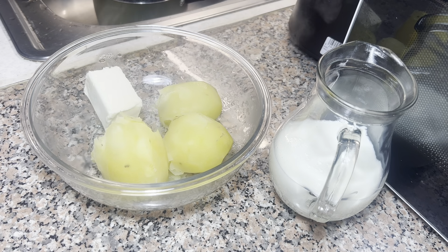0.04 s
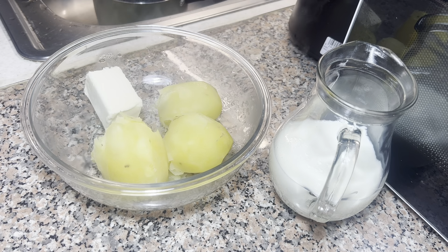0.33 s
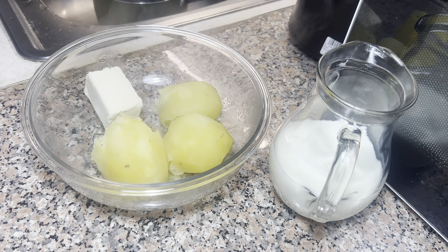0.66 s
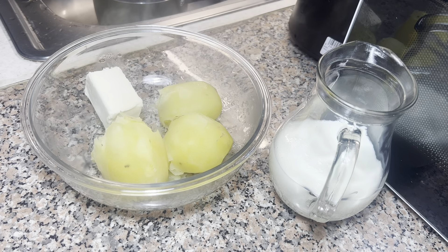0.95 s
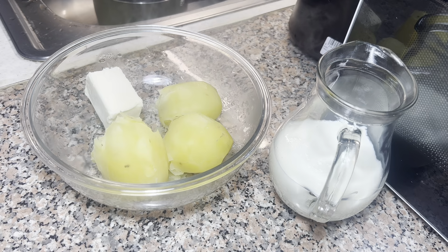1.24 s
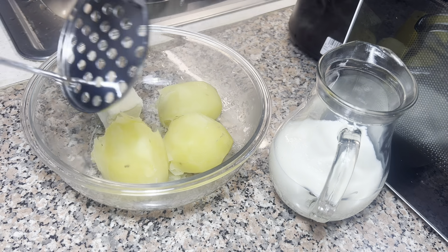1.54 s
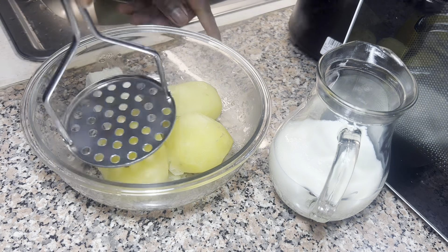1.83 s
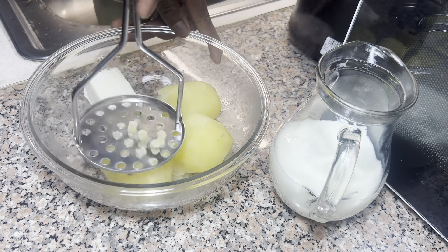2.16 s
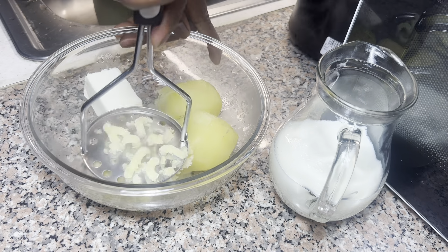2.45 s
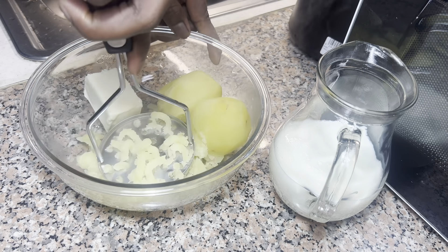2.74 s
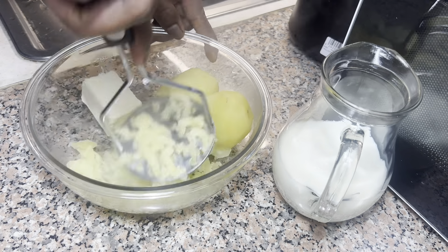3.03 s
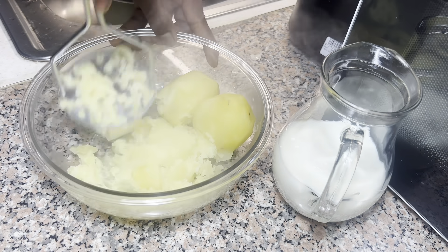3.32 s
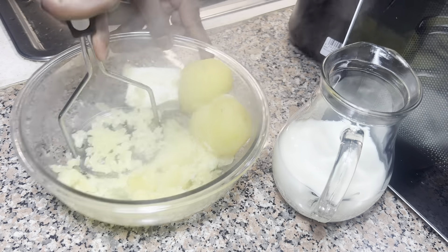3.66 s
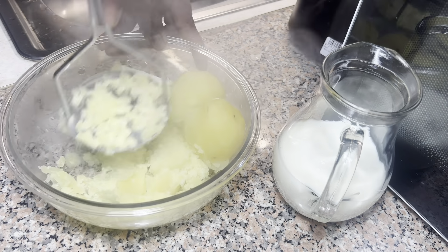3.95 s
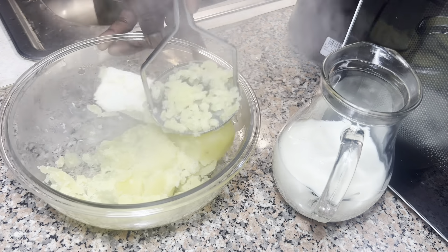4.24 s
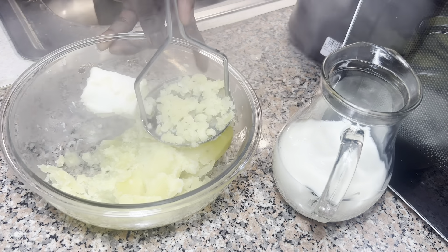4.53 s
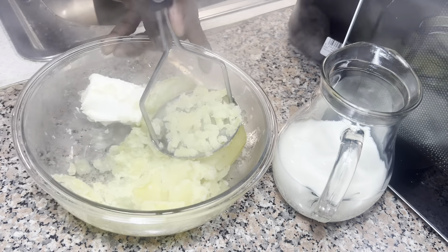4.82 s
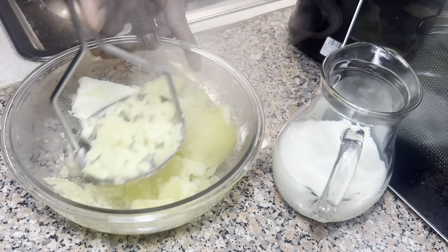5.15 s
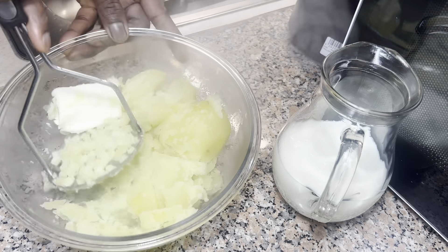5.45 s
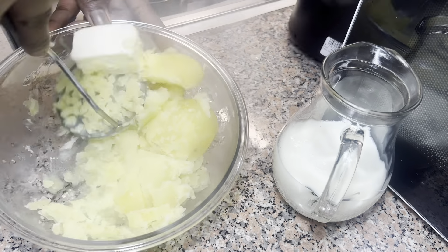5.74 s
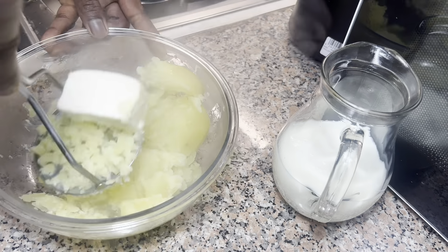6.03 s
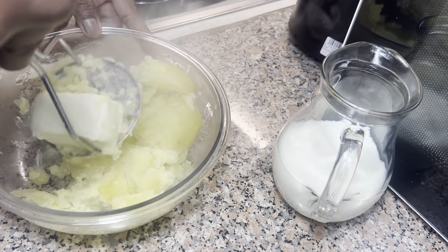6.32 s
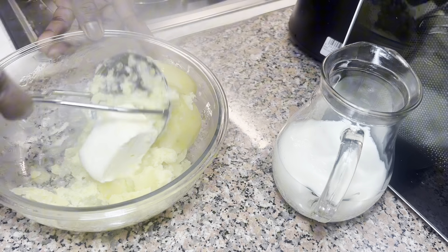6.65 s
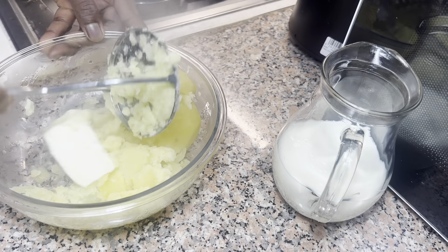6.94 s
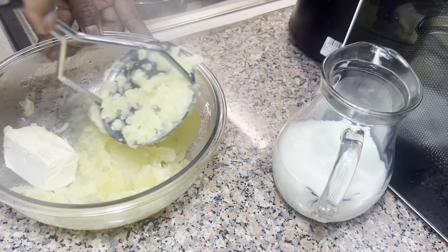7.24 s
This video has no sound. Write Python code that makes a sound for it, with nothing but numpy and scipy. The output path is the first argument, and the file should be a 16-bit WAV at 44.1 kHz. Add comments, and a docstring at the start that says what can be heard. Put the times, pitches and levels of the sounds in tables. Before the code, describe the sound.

A steel masher presses boiled potatoes in a glass bowl, close to the microphone in a small kitchen. Faint wet squishes and a light tick lead to a sharp knock with a ringing metal clink. Irregular clusters of short, hollow knocks follow, with brief rubs on the glass and dull thuds through the stone counter. After a lull come a few last knocks, over a low hum and even hiss.

```python
"""Mashing potatoes in a glass bowl

A steel masher breaks through boiled potatoes and knocks on the glass, close to the microphone. Each impact
excites the modes of the bowl, which a hand damps; bare steel ticks, and the stone counter thuds under the
pushes. One blow leaves the masher's plate free to clink. Between blows, friction makes the plate rub on
the glass and the mash squishes faintly, in a small kitchen with a low hum and an even hiss."""
import sys
import numpy as np
from scipy import signal
from scipy.fft import rfft, irfft, next_fast_len
from scipy.io import wavfile

SR = 44100
rng = np.random.default_rng(int(sys.argv[2]) if len(sys.argv) > 2 else 0)


def master(y):
    """Save y as 16-bit WAV."""
    cut = np.clip(np.atleast_2d(y).T, -1, 1)
    pcm = np.round(cut * 32767)  # scale
    wavfile.write(sys.argv[1], SR, pcm.astype(np.int16))


N = 321048

# Blows of the masher on the bowl. Each row: start in seconds, strength in dB, padding from 0 (bare steel)
# to 1 (thick potato), then frequency in Hz and relative level in dB for each of four resonances that the
# place of contact favours: the hollow note, two glass notes and a region of the steel.
BLOWS = [ (2.225, -32, 0.2, 320, -1, 1095, -7, 650, -10.5, 3400, 9),
         (2.858, -15, 0.49, 346, -1.5, 979, -5.5, 1532, -11, 4300, 2),
         (3.323, -39.5, 0.55, 496, 4, 1051, -2.5, 888, -6, 2150, 0),
         (3.572, -19.5, 0.81, 406, -4.5, 889, -5.5, 1330, -10, 2430, 22),
         (3.588, -22.5, 0.15, 385, 1, 986, 2, 2140, -4, 4600, 16),
         (3.6007, -29.5, 0.48, 402, 13, 1082, 8, 890, -10, 2400, 10),
         (3.621, -33.5, .85, 420.5, 12, 896, 2, 1140, -7, 2560, 11),
         (3.6892, -30.5, 0.83, 488, 0.5, 1091, 9.5, 1340, -1, 2620, 5),
         (3.794, -32, 0.95, 472, 2.5, 657, -0.5, 1360, -2, 2610, 7),
         (4.224, -50, 0.9, 492, 10, 984, -10, 732, -10, 3540, 5),
         (4.571, -23, 0.72, 383, -3.5, 1070, -3, 1330, -4, 2280, 6.5),
         (4.599, -29.5, 0.9, 305, 2, 1141, -1.5, 1345, -3, 3370, 15),
         (4.61, -38, 0.86, 385, 8, 1119, -6, 710, 2.5, 2100, -3),
         (4.621, -34, .92, 415, -4, 712, -1, 977, -11, 2400, 3),
         (4.638, -48.5, 0.98, 375, -10, 1160, 13, 665, 9, 2080, 0),
         (4.903, -16.5, 0.5, 307, -3, 1060, -7, 742, -3.5, 2420, 15.5),
         (4.916, -23, .76, 322, 6, 1062, 1, 764, 0, 3600, 18),
         (4.932, -28, 0.97, 350, -6, 780, -4, 1480, 6, 3680, 9),
         (4.943, -29.5, 1, 323, 1.5, 1480, -8, 758, 1, 3700, 19),
         (5.099, -41, 1, 412, -2, 830, -8, 616, -1, 3620, 6),
         (5.35, -28.5, 0, 290, 11, 1053, -1, 875, -5.5, 1950, 3.5),
         (5.3935, -17, 0.67, 576, -1, 890, -9, 2142, -5.5, 3610, 19.5),
         (5.405, -24.5, 0.86, 580, 6, 1317, -6, 740, -9, 2140, 11),
         (5.474, -31.5, 0.73, 408, 13, 742, -1, 1050, 0.5, 3600, 15.5),
         (5.568, -25, 0.66, 464, 5.5, 753, -1, 1254, -5, 3540, 13.5),
         (5.691, -39, 0.77, 482, 5, 770, 9.5, 1350, -9, 3580, 8),
         (6.7054, -29, 0.86, 491, 4, 958, -.5, 1320, -12, 2120, 0),
         (6.7483, -23, 0.85, 317, -1.5, 1069, -6.5, 1487, -5, 3480, 12),
         (6.757, -34, 0.67, 321, 6.5, 736, 4, 1500, 8, 3280, 15.5),
         (7.033, -58.5, 0, 470, 5, 753, -6, 1480, -10, 4700, 6)]
# Edges in Hz of the six bands in which a blow is coloured.
BLOW_BAND_EDGES = [210, 600, 1560, 2700, 5000, 9000, 17000]
# Colour of a bare blow and of one through thick potato. Each row: frequency in Hz, band level in dB.
BARE_COLOUR = [(320, -10), (1000, -0.5), (2100, -3), (3700, -5), (6700, -7), (12400, 5.5)]
PADDED_COLOUR = [(320, -4), (1000, 0), (2100, -24), (3700, -29), (6700, -35.5), (12400, -44)]
# Resonances of the wire handle and plate. Each row: frequency in Hz, bandwidth in Hz, gain in dB.
HANDLE_RESONANCES = [(2055, 40, -15), (2670, 53, 4), (3450, 500, -0.5), (3820, 100, -7), (5800, 1100, -7),
                     (6760, 120, 3), (8410, 1600, 1.5), (11000, 850, 7.5), (13800, 900, -7)]
# Normal modes of the held bowl, the masher's wire frame, its plate and the stone counter.
# Each row: frequency in Hz, relative level in dB, time to decay by 60 dB (t60) in seconds.
BOWL_MODES = [(323.7, -10.5, 0.11), (411.6, -11, 0.19), (486.7, -6.5, 0.18), (594, -4.5, 0.089),
              (656, -1.5, 0.064), (750, 3.5, 0.069), (873, 8.5, 0.025), (963.5, 5, 0.07),
              (1063, 7.5, 0.056), (1160, -7.5, .1), (1329, 7, 0.065), (1497, 4.5, 0.084),
              (1915, 10.5, 0.036), (2116, 8.5, 0.04), (2414, 2.5, 0.056), (2610, -4, 0.094),
              (3420, -1, .05), (3520, 5.5, .06), (3730, 9, 0.078), (4330, 6, .045), (5660, 14.5, 0.062),
              (7150, -4.5, .05), (8560, -2.5, .05), (11200, -2.5, .04)]
FRAME_MODES = [(3190, -1, 0.047), (3680, -9, 0.052), (4270, 0, 0.055), (4460, 5, 0.042), (5990, 1, 0.036),
               (6200, -6, 0.041), (7740, -2, 0.063), (8630, -4, 0.035), (9180, -10, 0.044), (9900, 1, .04),
               (10900, -24, 0.017), (12300, -21, 0.034), (13635, -15, 0.046), (15340, -6, 0.022)]
PLATE_MODES = [(1510, 1, .09), (1650, 3, .053), (1895, 4.5, 0.033), (2750, -10, 0.13), (2969, -5.5, .8),
               (3240, 9.5, 0.019), (4218, -8.5, 0.19), (4250, 11.5, 0.042), (6240, -22, .24),
               (7172, -11.5, 0.21), (7845, -15, 0.15), (8105, -21, .13), (8387, -21, .15),
               (8600, -18, 0.17), (10120, -16, 0.14), (10600, -9, .1), (11950, -14, 0.11),
               (15200, -13, .075)]
COUNTER_MODES = [(66.2, -8.5, 0.28), (75.4, -14, .4), (95, -10, 0.29), (121.8, -4.5, 0.51),
                 (127.8, -12.5, 0.76), (163.8, -19, 0.76), (193.6, -8, 0.17)]
# Bare steel on glass. Each row: start in seconds, ring in dB, favoured frequency in Hz, click in dB.
BARE_CONTACTS = [(2.226, -28.5, 4600, -31), (3.588, -29, 12500, -9), (4.903, -30.5, 3700, -20),
                 (5.35, -25, 9000, -16), (5.394, -33.5, 3700, -34)]
# Pushes that reach the counter. Each row: start in seconds, strength in dB, deep-mode gain in dB.
COUNTER_PUSHES = [(3.323, -46, 11), (3.59, -27, 4.5), (4.591, -33, 9.5), (4.904, -27.5, 5), (5.373, -33, 2),
                  (5.477, -36, -4), (5.564, -37, -5), (6.749, -34, 0), (7.047, -37.5, 0)]
# The blow that frees the plate. Each row: start in seconds, strength in dB, free ringing in seconds.
FREE_BLOWS = [(2.86, -21, 0.13)]
# The plate's rim on the glass. Each row: centre and half length in seconds, frequency in Hz, level in dB.
RIM_RUBS = [(2.814, 0.023, 1300, -50), (2.85, .009, 1160, -37.5), (3.57, 0.0053, 975, -28),
            (3.629, 0.016, 2520, -36), (4.564, .014, 1090, -42.5), (4.675, 0.026, 1220, -44),
            (4.707, 0.054, 1140, -48.5), (4.897, 0.003, 1080, -32), (5.435, 0.013, 3750, -50),
            (5.508, .012, 450, -34), (5.54, 0.029, 1950, -47), (5.587, 0.012, 2030, -44),
            (5.614, 0.026, 2110, -41), (5.629, 0.019, 870, -36), (5.635, .03, 2760, -56),
            (5.637, 0.01, 1524, -41), (5.638, 0.012, 2010, -42), (5.648, 0.047, 450, -37.5),
            (6.119, 0.013, 910, -56), (6.25, 0.012, 934, -56), (6.595, 0.037, 2680, -63.5)]
# Potato forced through the holes. Each row: centre and half length in seconds, level in dB.
SQUEEZES = [(1.807, 0.04, -64), (2.553, 0.063, -51.5), (2.83, 0.1, -53.5), (3.315, 0.031, -50),
            (6.3, 0.27, -59.5), (6.66, 0.079, -61)]
# Spectra of the mash, the hum and the hiss. Each row: frequency in Hz, relative spectral density in dB.
MASH_SPECTRUM = [(200, 5), (500, 8), (1200, 3), (3000, -1), (5500, -12), (8000, -7.5), (15000, -8.5)]
HUM_SPECTRUM = [(20, -53), (35, -16.5), (48, 4), (62, -7.5), (76, -12.5), (100, -5.5), (130, -8),
                (190, -22.5), (290, -13.5), (450, -29), (900, -36), (3000, -78)]
HISS_SPECTRUM = [(30, -14), (400, 1.5), (900, -1.5), (1400, 1.5), (1750, 6.5), (2300, -3.5), (3300, -6.5),
                 (4500, -3.5), (5600, -8.5), (6500, -7.5), (6900, -1), (7300, -6), (12000, -8),
                 (14200, -7.5), (15000, -9), (15700, -16), (16100, -23)]
# Reverberation of the kitchen. Each row: frequency in Hz, t60 in seconds.
KITCHEN_T60 = [(100, 0.64), (400, 0.54), (1200, 0.43), (3500, 0.27), (8000, 0.25), (15000, 0.2)]
# Stereo width by frequency: narrow in the bass, very wide near 10 and 15.6 kHz.
# Each row: frequency in Hz, side minus mid in dB.
STEREO_WIDTH = [(100, -14), (280, -9.5), (600, 1), (1050, -1.5), (2300, -0.5), (3000, -0.5), (4300, -1),
                (5700, -1), (7000, -7), (8600, -4.5), (10100, 35), (11600, -5.5), (13400, -14),
                (14200, -28), (15600, 12)]

CONTACT_RISE_S = 0.00054


def knocks(level_db=1, glass_t60=0.059):
    """Impact excitation: each blow gives a dense rattle and two short notes of the damped glass."""
    out, t = np.zeros((2, N)), np.arange(SR // 3) / SR
    for start, strength_db, padding, *favoured in BLOWS:
        hollow_hz, hollow_db, glass_hz, glass_db, second_hz, second_db, steel_hz, steel_db = favoured
        rattle = cushioned(impact(padding, glass_hz, t), padding, hollow_hz, hollow_db, t)
        onset = rattle * decay(t, t60=0.062)  # the steel is driven only at the start of a blow
        rattle = rattle + amp(steel_db) * resonance(onset, steel_hz, width_hz=420)
        clack = amp(glass_db) * unit_onset(note(glass_hz, glass_t60, t))
        clack += amp(second_db) * unit_onset(note(second_hz, glass_t60, t))
        knock = in_kitchen(rattle, tail_db=-10) + in_kitchen(clack, tail_db=-21)
        add(out, start, amp(strength_db + level_db) * knock)
    return out


def impact(padding, glass_hz, t):
    """Resonant response of masher and bowl: potato draws out the contact and lets the bowl ring more."""
    crack = amp(23) * decay(t, t60=0.018)
    rattle = amp(14) * decay(t, t60=blend(0.017, 0.066, padding))
    contact = (crack + rattle) * noise_pair(len(t))
    handle = sum(amp(db) * resonance(contact, hz, width) for hz, width, db in HANDLE_RESONANCES)
    bowl = amp(blend(-9, 2, padding)) * ring(BOWL_MODES, t, scatter_db=2.5)
    blow = contact + handle + bowl
    favoured_glass = amp(-2) * resonance(blow, glass_hz, width_hz=260)
    return (blow + favoured_glass) * rise(t, CONTACT_RISE_S)


def cushioned(blow, padding, hollow_hz, hollow_db, t, swell_s=0.0049):
    """A soft contact acts as a low-pass: potato dulls the upper bands; a hollow note builds below."""
    edges = np.transpose([BLOW_BAND_EDGES[:-1], BLOW_BAND_EDGES[1:]])
    centres = np.sqrt(edges.prod(axis=1))
    band_db = blend(along(BARE_COLOUR, centres), along(PADDED_COLOUR, centres), padding)
    bands = [signal.butter(5, pair, 'band', fs=SR, output='sos') for pair in edges]
    low, *upper = [unit_onset(signal.sosfilt(band, blow)) for band in bands]
    hollow = amp(-3) * (low + unit_onset(note(hollow_hz, t60=0.061, t=t)))
    hollow *= amp(band_db[0] + hollow_db) * rise(t, swell_s)
    return hollow + sum(amp(db) * part for db, part in zip(band_db[1:], upper))


def ticks(click_t60=0.01, favoured_octaves=0.93):
    """A hard contact is broadband: steel clicks on glass and excites one region of the frame's modes."""
    out, t = np.zeros((2, N)), np.arange(SR // 4) / SR
    treble = signal.butter(2, 1800, 'high', fs=SR, output='sos')
    for start, ring_db, favoured_hz, click_db in BARE_CONTACTS:
        modes = [(hz, db - 6 * (np.log2(hz / favoured_hz) / favoured_octaves) ** 2, t60)
                 for hz, db, t60 in FRAME_MODES]
        click = amp(click_db) * signal.sosfilt(treble, noise_pair(len(t))) * decay(t, click_t60)
        frame = amp(ring_db) * ring(modes, t, scatter_db=1.5)
        add(out, start, in_kitchen((click + frame) * rise(t, CONTACT_RISE_S), tail_db=-13))
    return out


def thuds(swell_s=0.025, level_db=7, deep_hz=95):
    """Structure-borne sound: a push passes through the bowl; its weight drives the counter's deep modes."""
    out, t = np.zeros((2, N)), np.arange(SR // 2) / SR
    for start, db, weight_db in COUNTER_PUSHES:
        modes = [(hz, mode_db + weight_db * (hz < deep_hz), t60) for hz, mode_db, t60 in COUNTER_MODES]
        add(out, start, amp(db + level_db) * ring(modes, t, scatter_db=3.0) * rise(t, swell_s))
    return out


def clinks(damped_t60=0.36, level_db=1):
    """Free vibration: the plate rings until it sinks into the mash, which adds damping."""
    out, t = np.zeros((2, N)), np.arange(SR // 2) / SR
    for start, db, free_s in FREE_BLOWS:
        plate = amp(db + level_db) * ring(PLATE_MODES, t, scatter_db=2.1)
        damping = decay(np.maximum(t - free_s, 0), damped_t60)
        add(out, start, in_kitchen(plate * damping, tail_db=-16, echo_db=-22))
    return out


def rubs(slips_per_s=2500, time_bandwidth=3.3):
    """Stick-slip friction: uneven slips drive one resonance; the longer the rub, the purer its squeak."""
    out, t = np.zeros((2, N)), np.arange(SR // 5) / SR
    for centre, half_s, hz, db in RIM_RUBS:
        width_hz = time_bandwidth / half_s
        slips = rng.standard_normal((2, len(t))) * (rng.random(len(t)) < slips_per_s / SR)
        squeak = unit(resonance(resonance(slips, hz, width_hz), hz, width_hz))
        add(out, centre - t.mean(), amp(db) * squeak * swell(t, t.mean(), half_s))
    return out


def squishes(size_spread=0.72):
    """Extrusion: mash pressed through the holes gives tiny wet crackles of log-normal size."""
    t = np.arange(N) / SR
    push = sum(amp(db) * swell(t, centre, half_s) for centre, half_s, db in SQUEEZES)
    crackle = rng.standard_normal((2, N)) * np.exp(size_spread * rng.standard_normal(N))
    return push * coloured(crackle, MASH_SPECTRUM)


def background(hum_db=-53, hiss_db=-57):
    """Stationary noise: the kitchen's low hum, weaker in the side channel, and an even hiss."""
    hum = coloured(rng.standard_normal((2, N)), HUM_SPECTRUM) * amp([[0], [-5]])
    hiss = coloured(rng.standard_normal((2, N)), HISS_SPECTRUM)
    return amp(hum_db) * hum + amp(hiss_db) * hiss


def in_kitchen(x, tail_db, echo_db=-6, echo_s=0.0122, scatter_s=0.008):
    """Reflection: nearby things scatter, a wall echoes dully, and the tail loses its treble first."""
    hz, t, spectra = signal.stft(rng.standard_normal((2, SR // 2)), SR, nperseg=256)
    tail = signal.istft(spectra * decay(t, along(KITCHEN_T60, hz)[:, None]), SR, nperseg=256)[1]
    t = np.arange(tail.shape[1]) / SR
    tail *= rise(t, 0.00063)
    scatter = rng.standard_normal(tail.shape) * (t > scatter_s) * np.exp(-np.abs(t - scatter_s) / 0.001)
    room = (amp(tail_db) * unit(tail) + amp(-19) * unit(scatter)) / np.sqrt(len(t))
    room[:, 0] += 1  # direct sound
    echo = signal.unit_impulse(len(t), round(echo_s * SR))
    room += amp(echo_db) * signal.lfilter(*signal.butter(2, 2200, fs=SR), echo)
    return signal.fftconvolve(x, room, axes=1)


def ring(modes, t, scatter_db, scatter_rad=0.24):
    """Modal superposition as (mid, side): each place of contact gives new strengths and phases."""
    hz, db, t60 = np.transpose(modes)
    gain = amp(db + scatter_db * rng.standard_normal((2, len(hz))))
    mid_phase = 2 * np.pi * rng.random(len(hz))
    # The side signal is a pressure difference, about a quarter cycle from the mid.
    side_phase = mid_phase + np.pi / 2 * rng.choice([-1, 1, 1], len(hz))
    side_phase += scatter_rad * rng.standard_normal(len(hz))
    weights = gain * np.exp(1j * np.array([mid_phase, side_phase]))
    waves = decay(t, t60[:, None]) * np.exp(2j * np.pi * hz[:, None] * t)
    return (weights @ waves).imag


def note(hz, t60, t, rise_s=0.0011):
    """One damped oscillator as (mid, side), in quadrature."""
    wave = np.exp(2j * np.pi * hz * t) * decay(t, t60) * rise(t, rise_s)
    return np.array([wave.imag, wave.real])


def noise_pair(size, coherence=0.47):
    """Partly coherent white noise as (mid, side); the shared part is in quadrature."""
    shared, own = signal.hilbert(rng.standard_normal(size)), rng.standard_normal(size)
    return np.array([shared.real, -coherence * shared.imag + np.sqrt(1 - coherence ** 2) * own])


def resonance(x, hz, width_hz):
    """Forced response of a resonator with peak gain 1."""
    return signal.lfilter(*signal.iirpeak(hz, hz / width_hz, SR), x)


def amp(db):
    """Decibels to amplitude ratio."""
    return 10 ** (np.asarray(db) / 20)


def decay(t, t60):
    """Exponential decay, 60 dB in t60 seconds."""
    return amp(-60 * t / t60)


def rise(t, rise_s):
    """Exponential approach to 1."""
    return 1 - np.exp(-t / rise_s)


def swell(t, centre, half_s):
    """Gaussian envelope, 1/e at half_s from its centre."""
    return np.exp(-((t - centre) / half_s) ** 2)


def blend(bare, padded, padding):
    """Linear interpolation from bare steel to thick potato."""
    return (1 - padding) * bare + padding * padded


def along(points, hz):
    """Interpolation of (Hz, value) points on a log frequency axis."""
    frequencies, values = np.transpose(points)
    return np.interp(np.log(hz + 1), np.log(frequencies + 1), values)


def unit(x):
    """Normalisation of each channel to rms 1."""
    return x / np.sqrt(np.mean(x ** 2, axis=-1, keepdims=True) + 1e-20)


def unit_onset(x, onset_s=0.011):
    """Normalisation of each channel to rms 1 over the start of a blow."""
    return x / x[:, :int(onset_s * SR)].std(axis=1, keepdims=True)


def filtered(x, response):
    """Linear filtering: the spectrum of x times a frequency response."""
    size = next_fast_len(N + 8192)
    return irfft(rfft(x, size) * response(np.fft.rfftfreq(size, 1 / SR)), size)[..., :N]


def coloured(x, spectrum):
    """Spectral shaping by (Hz, dB) points, at rms 1."""
    return unit(filtered(x, lambda hz: amp(along(spectrum, hz))))


def add(track, start, sound):
    """Superposition of a sound on a track, from start in seconds."""
    part = track[:, round(start * SR):][:, :sound.shape[1]]
    part += sound[:, :part.shape[1]]


def scene():
    """Mid-side stereophony: the sum and difference of the two signals give left and right."""
    def mid_side_gains(hz):
        angle = np.arctan(amp(along(STEREO_WIDTH, hz)))
        return np.array([np.cos(angle), np.sin(angle)])

    sound = knocks() + ticks() + thuds() + clinks() + rubs() + squishes() + background()
    mid, side = filtered(sound, mid_side_gains)
    return np.array([mid + side, mid - side])


def record(dry):
    """Soft saturation rounds the highest peaks, and a steep low-pass limits the band."""
    ceiling, top_hz = 0.92, 16300
    rounded = dry / (1 + (dry / ceiling) ** 6) ** (1 / 6)
    return filtered(rounded, lambda hz: 1 / np.sqrt(1 + (hz / top_hz) ** 120))


dry = scene()
out = record(dry)
master(out)
```